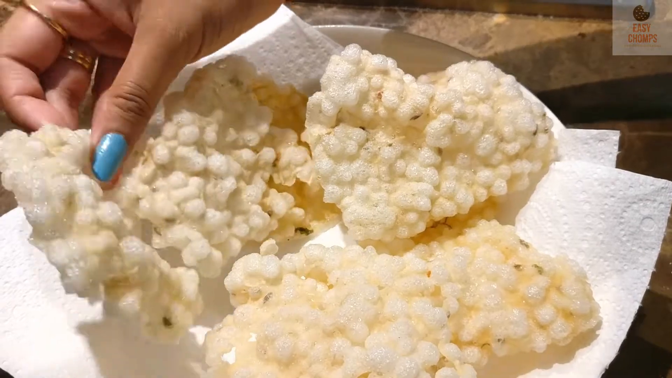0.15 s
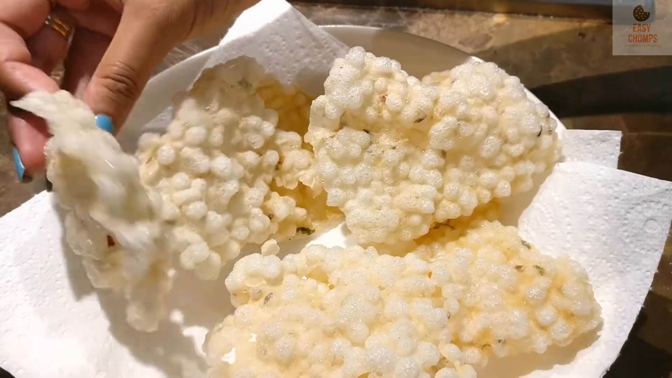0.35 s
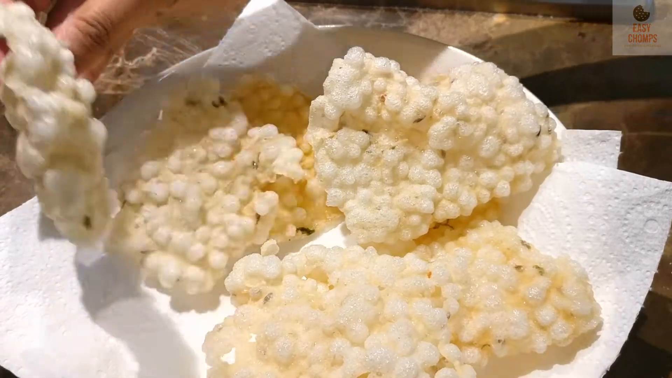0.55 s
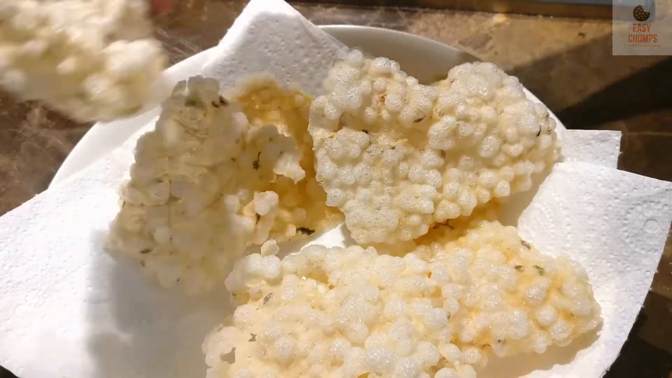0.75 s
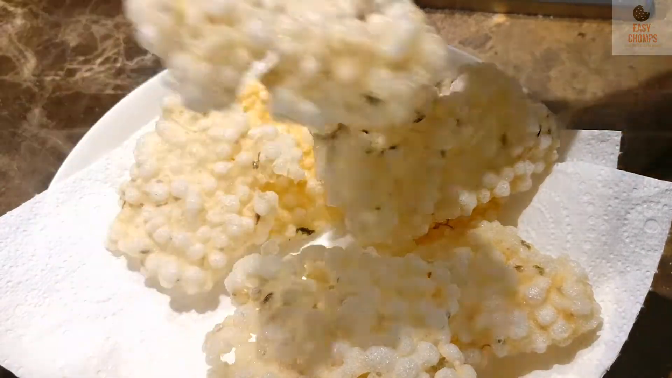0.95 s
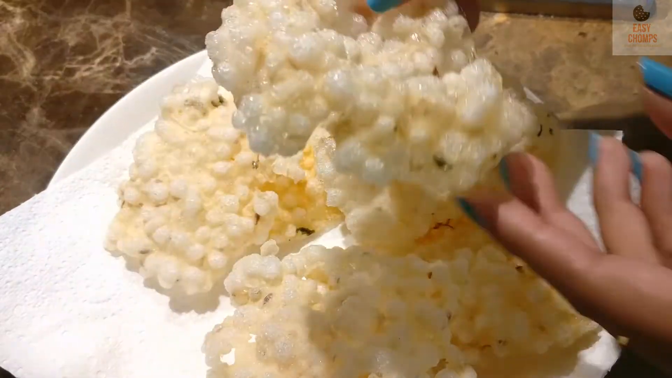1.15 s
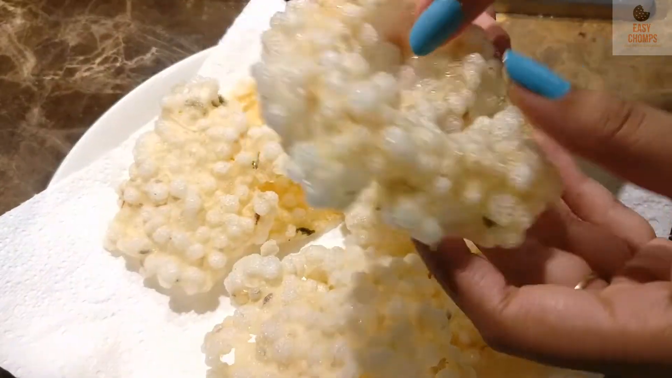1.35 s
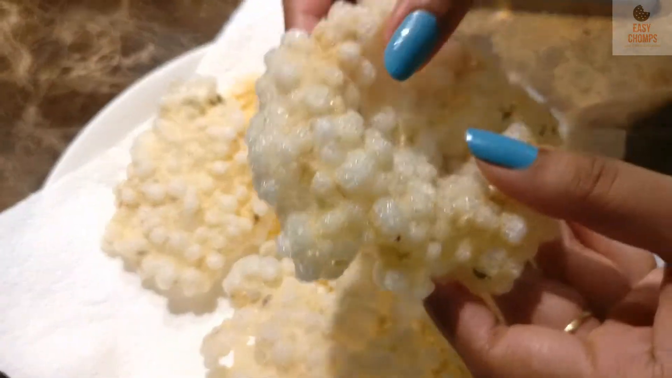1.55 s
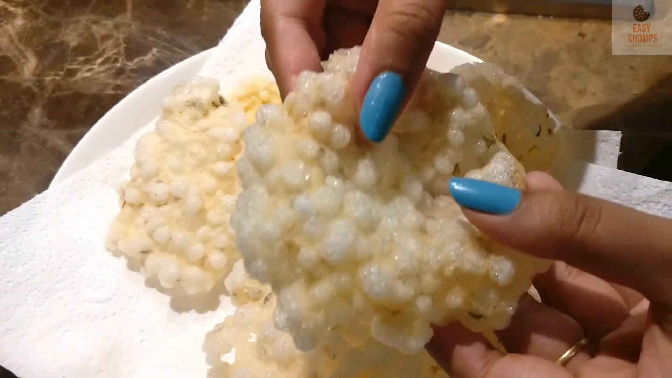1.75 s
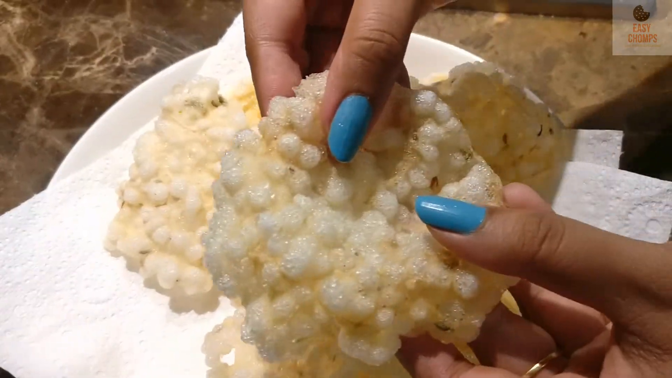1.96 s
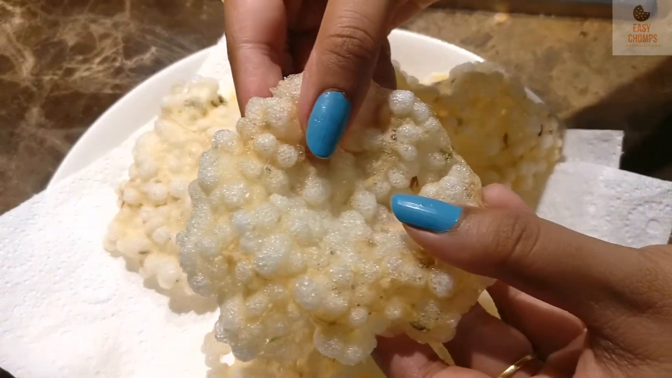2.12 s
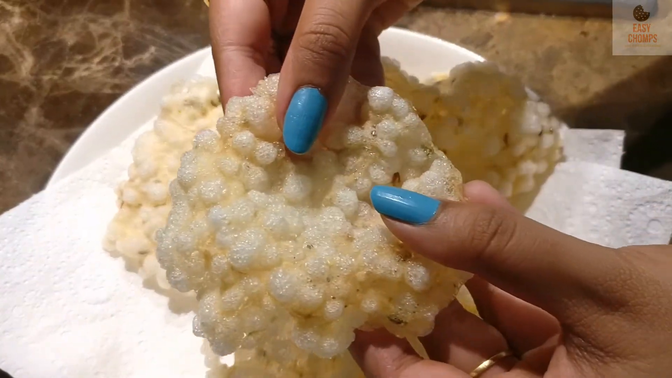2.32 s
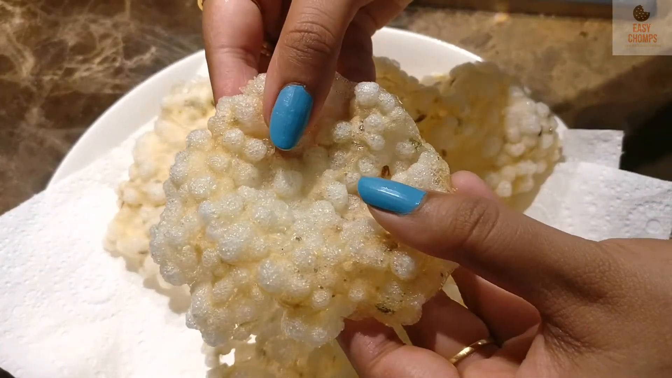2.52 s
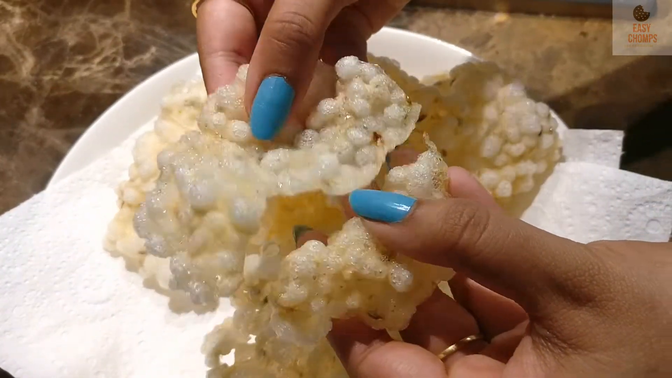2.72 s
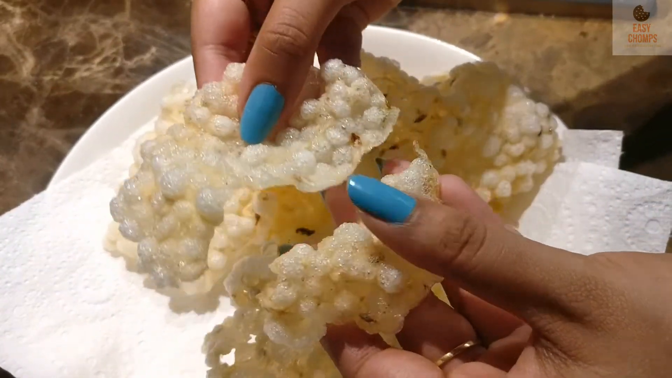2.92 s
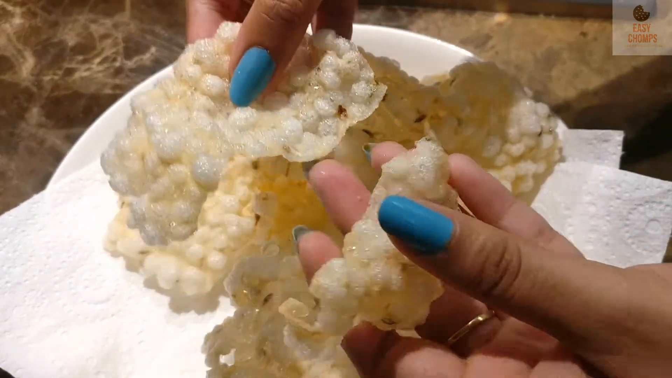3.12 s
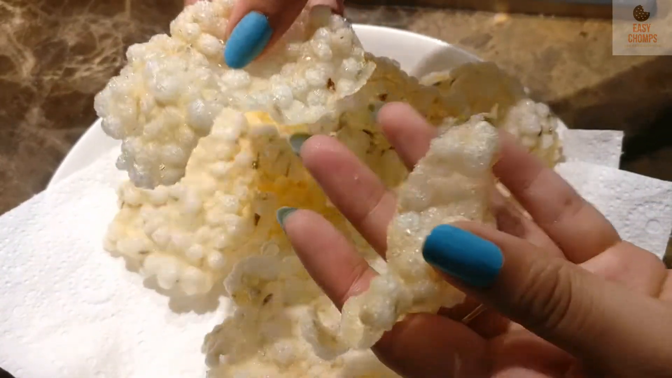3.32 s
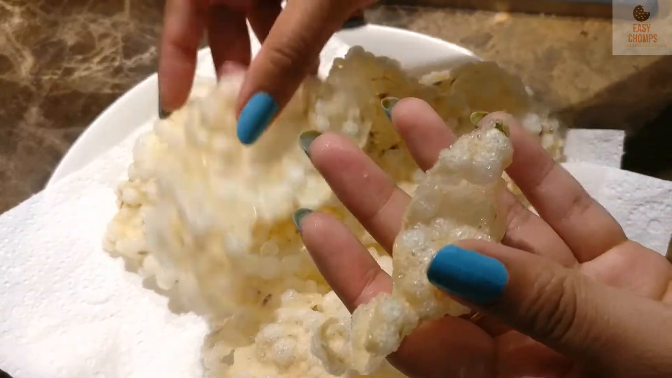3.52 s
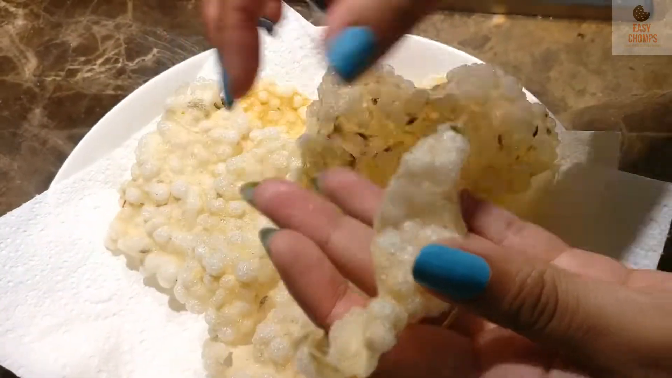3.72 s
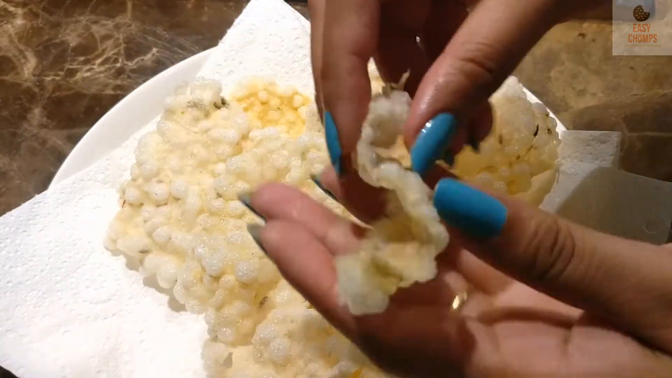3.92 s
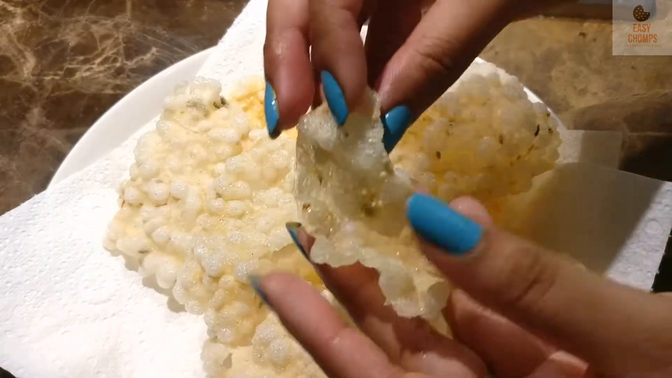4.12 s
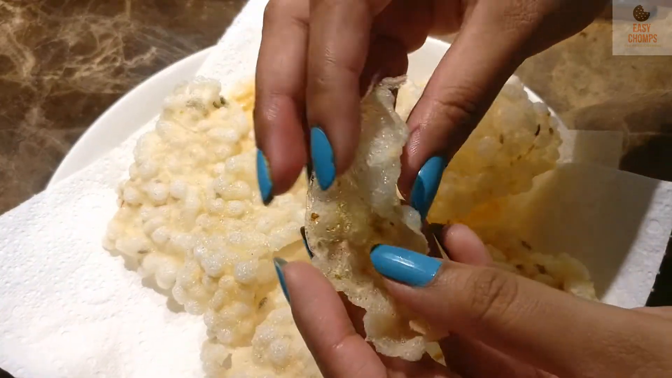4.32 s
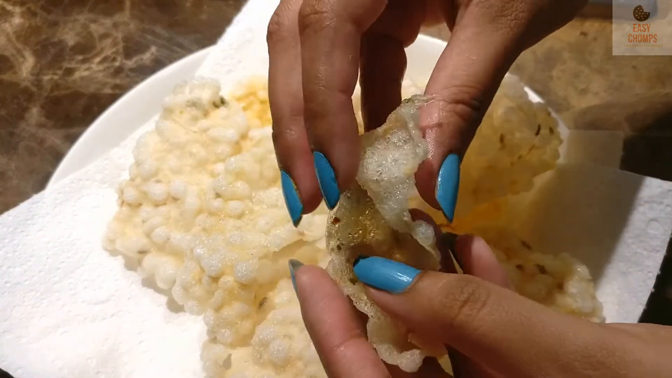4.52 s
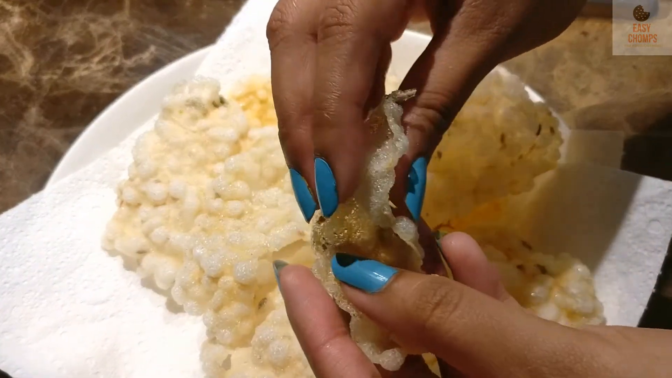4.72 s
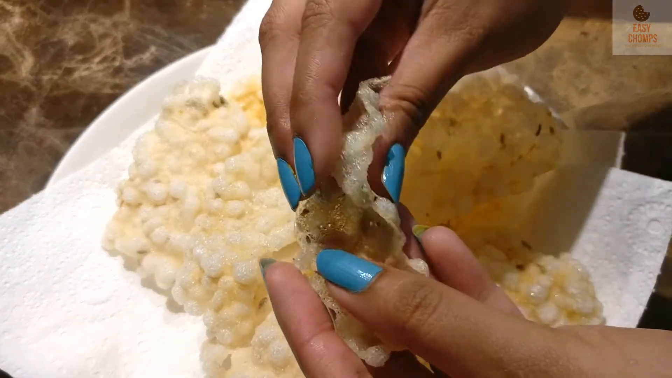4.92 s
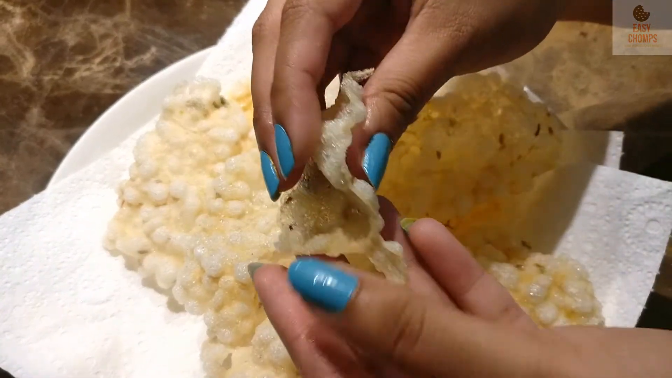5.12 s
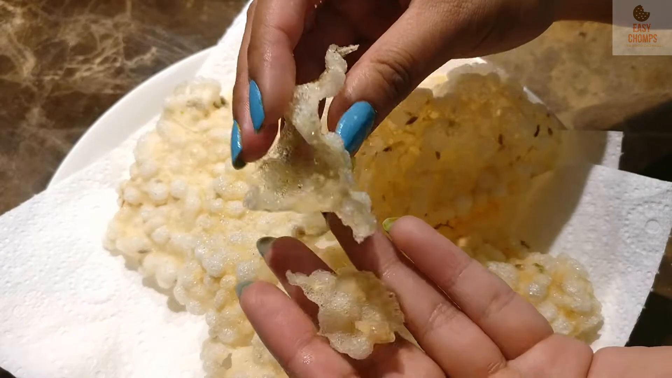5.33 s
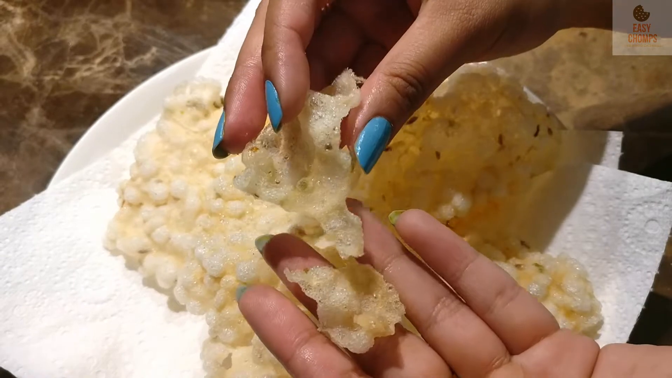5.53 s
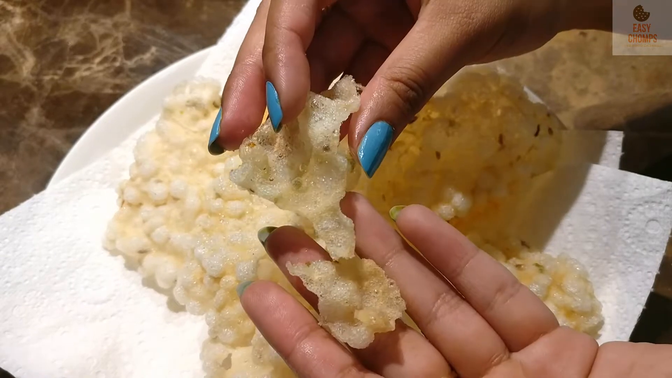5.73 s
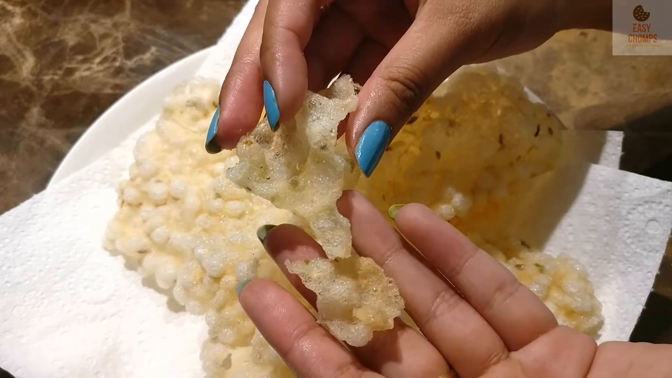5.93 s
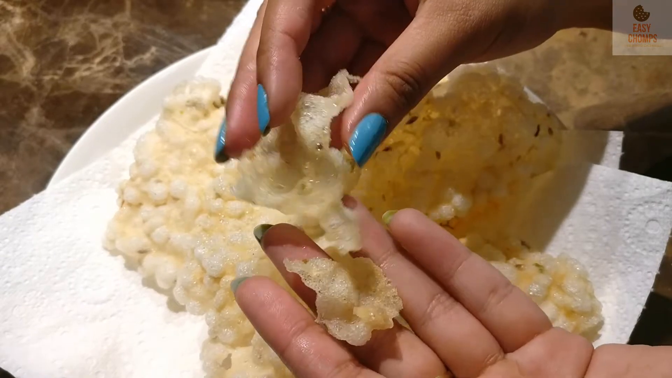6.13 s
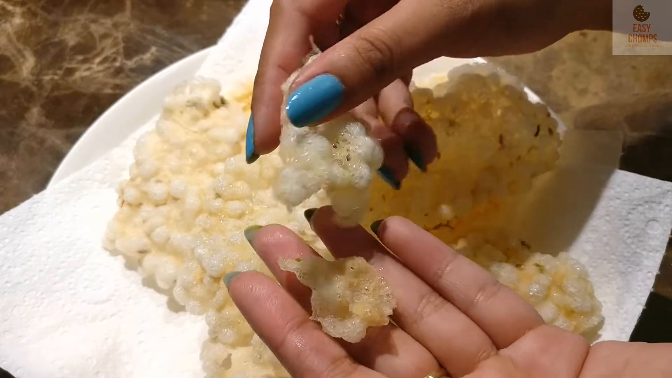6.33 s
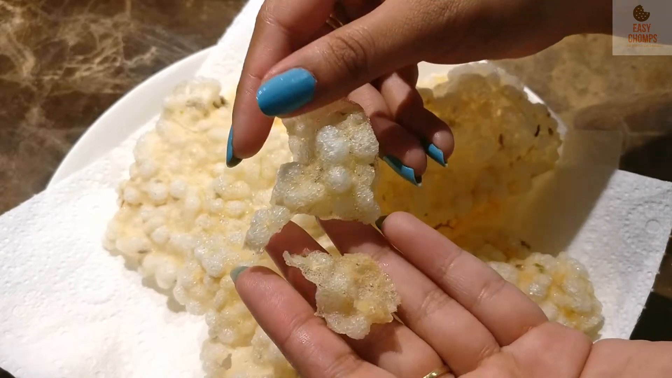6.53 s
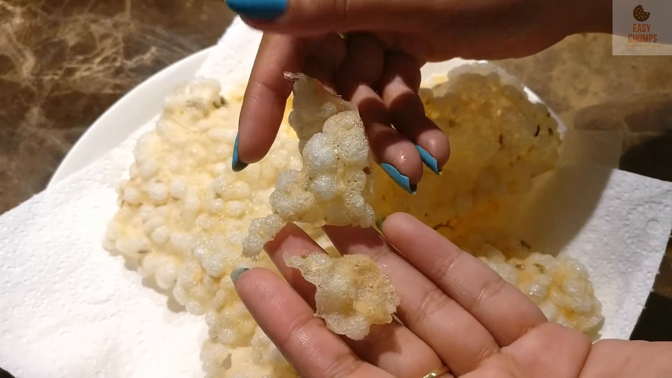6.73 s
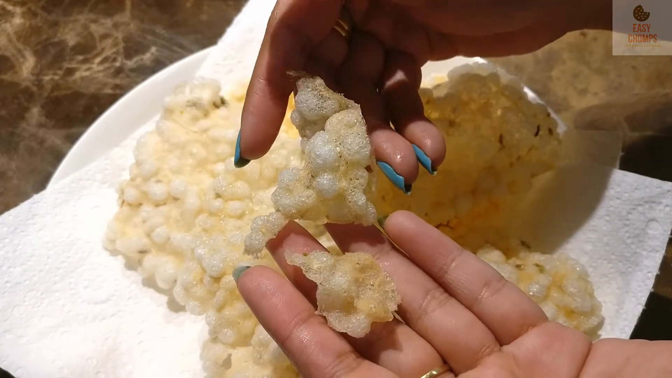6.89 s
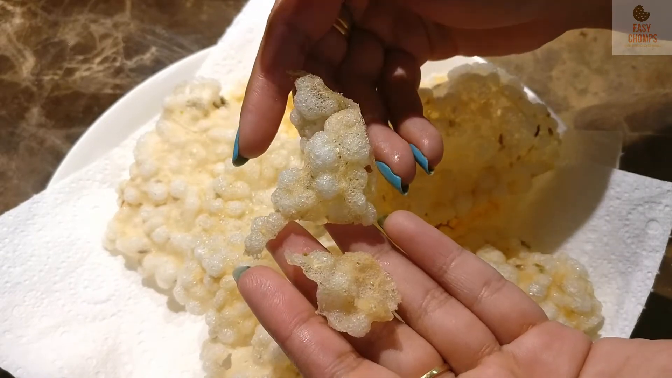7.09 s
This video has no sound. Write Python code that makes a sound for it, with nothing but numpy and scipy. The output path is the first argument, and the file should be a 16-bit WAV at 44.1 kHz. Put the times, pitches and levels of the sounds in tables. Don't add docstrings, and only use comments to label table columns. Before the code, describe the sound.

A low fan hum near 48 Hz wavers throughout with room rumble and soft hiss, in a kitchen with short, faint echoes. From 0 to 0.6 s, quiet scratchy rubs and small dry ticks as a puffed fried cracker is lifted; from 0.55 s a faint papery brush for about 0.4 s, with two light ticks near 0.95. Between 1.2 and 1.8 s, delicate crackly handling. From 1.95 to 2.7 s, separate brittle snaps gather as it bends, then at 2.73 s a dense, loud, bright tearing crack, over in a few hundredths of a second, with short woody body. Small rustles follow; around 3.65 s the piece lands with a light crunch. Fine ticks near 4, crackles at 4.35-4.5, then a sharp snap at 4.93 s with trailing crumbs. After 5.1 s only sparse tiny ticks and faint rubs over the hum until about 7.1 s.

```python
import sys
import numpy as np
from scipy import signal
from scipy.fft import rfft, irfft, next_fast_len
from scipy.io import wavfile
from scipy.ndimage import uniform_filter1d, minimum_filter1d

SR = 44100
rng = np.random.default_rng(int(sys.argv[2]) if len(sys.argv) > 2 else 0)


def pcm_store(signal):
    levels = np.round(np.clip(np.atleast_2d(signal), -1, 1) * 32767)
    wavfile.write(sys.argv[1], SR, levels.astype(np.int16).T)


def gain_from_db(level_db):
    decades = np.asarray(level_db, float) / 20
    return 10 ** decades


N = 315674
SIZE = next_fast_len(N)
FREQ = np.fft.rfftfreq(SIZE, 1 / SR)
TIME_S = np.arange(N) / SR
TOP_EDGE_HZ = 15820
TREBLE_FROM_HZ, TREBLE_CUT_DB = 6300, -24


def on_log_hz(table, hz):
    f, v = np.transpose(table)
    return np.interp(np.log(hz + 1), np.log(f), v)


def causal(table, size=512):
    cepstrum = irfft(np.log(gain_from_db(on_log_hz(table, np.fft.rfftfreq(size, 1 / SR)))))
    cepstrum[1:size // 2] *= 2
    cepstrum[size // 2 + 1:] = 0
    return irfft(np.exp(rfft(cepstrum)))


def band(x, lo_hz, hi_hz):
    edges = [lo_hz, min(hi_hz, .45 * SR)]
    return signal.sosfilt(signal.butter(2, edges, "band", fs=SR, output="sos"), x)


def walk(rate_hz):
    hold = int(SR / rate_hz)
    steps = np.repeat(rng.standard_normal(N // hold + 1), hold)
    return 1.3 * uniform_filter1d(uniform_filter1d(steps, hold), hold)[:N]


def stereo_noise(gain, alike_hz=540, steep=2.2):
    draws = rng.standard_normal((2, len(FREQ))) + 1j * rng.standard_normal((2, len(FREQ)))
    mid, side = draws * gain
    alike = .996 / (1 + (FREQ / alike_hz) ** steep)
    mid, side = mid * np.sqrt(1 + alike), side * np.sqrt(1 - alike)
    return irfft([mid + side, mid - side], SIZE)[:, :N]


def kitchen():
    # freq_hz, density_db [dB per Hz]
    hiss_colour = [(110, -19.5), (150, -3), (180, -17.5), (300, -15), (480, -18.5), (950, -19.5),
                   (2300, -23.5), (3100, -29), (4500, -30), (5600, -34), (7500, -43.5), (11000, -40.5),
                   (15300, -34), (15750, -30.5)]
    # freq_hz, width_hz, level_db
    rumble = [(46, 11, -63.5), (69, 14, -53), (100.1, 20.3, -52), (121.8, 11, -61), (141, 32, -65.5),
              (193.8, 32, -68.5), (281.9, 34, -71), (393.5, 9.7, -81)]
    hiss_db, busy_db, busy_s = -68.5, 2.5, 2
    hiss = stereo_noise(gain_from_db(on_log_hz(hiss_colour, FREQ)) * (FREQ < TOP_EDGE_HZ))
    drift_db = busy_db * np.exp(-TIME_S / busy_s)
    out = hiss * gain_from_db(hiss_db + 3.0 + drift_db + 0.18 * walk(2.0)) / np.std(band(hiss, 320, 16500))
    for hz, width, db in rumble:
        mode = stereo_noise(1 / (1 + (2 * (FREQ - hz) / width) ** 2))
        out = out + mode * gain_from_db(db + 0.23 * walk(1.0)) / np.std(mode)
    squeak_s, length_s, squeak_hz, squeak_db = 3.49, .1, 1160, -77
    squeak = band(rng.standard_normal(N), squeak_hz - 25, squeak_hz + 25)
    swell = np.exp(-((TIME_S - squeak_s) / length_s) ** 4)
    return out + gain_from_db(squeak_db) * squeak / np.std(squeak) * swell


def fan_tone(tone_hz=47.8, wander_hz=.8, flutter_db=3, pan_db=1.1):
    # time_s, level_db
    swells = [(0.0, -57.5), (1.04, -62), (1.08, -56.5), (1.93, -54), (2.05, -73), (2.11, -53.5),
              (2.91, -61.5), (2.95, -54.5), (4.6, -59), (4.64, -53.5), (5.54, -53.5), (6.22, -65),
              (6.74, -53.5), (7.16, -52.5)]
    s, db = np.transpose(swells)
    phase = 2 * np.pi * np.cumsum(tone_hz + wander_hz * walk(3.0)) / SR
    pan = pan_db * walk(6.5) * np.array([[1], [-1]])
    level_db = np.interp(TIME_S, s, db) + flutter_db * walk(22) + pan
    return 2 ** .5 * gain_from_db(level_db) * np.sin(phase)


def scuffs():
    # centre_s, level_db, length_ms, ring_hz, treble_db
    sheet_rubs = [(0.063, -60, 38, 3650, -15), (.19, -56.5, 72, 4120, -6), (.265, -62, 49, 4000, -9.5),
                  (0.304, -58.5, 29, 3900, -9), (0.368, -68, 26, 4930, -3), (.475, -58.5, 39, 3770, -9),
                  (.547, -62, 37, 3970, -20.5), (1.328, -60, 19.6, 4300, -5), (1.401, -60.5, 33, 4170, -10),
                  (1.444, -61, 33, 4300, -6.5), (1.65, -59, 45, 4260, -7), (1.735, -58, 46, 4270, -4),
                  (1.79, -66.5, 18, 4200, -13), (2.744, -29, 28, 4524, -1), (2.845, -49, 60, 3780, -11.5),
                  (3.249, -55.5, 56, 4120, -16), (3.648, -47.5, 42, 4700, -5.5)]
    # centre_s, level_db, length_ms, ring_hz, treble_db
    strip_rubs = [(3.432, -58.5, 66, 5200, -14.5), (3.49, -63, 24, 3560, -14), (3.967, -58, 52, 5100, -6.5),
                  (4.084, -65.5, 110, 5100, 0), (4.148, -60, 18, 4970, 4), (4.32, -65.5, 39, 5000, 1.3),
                  (4.378, -45.5, 34, 4400, -8.5), (4.464, -42, 31.5, 3780, -13.5),
                  (4.645, -65, 18, 5140, 1), (4.732, -65, 62, 4380, -4.5), (4.916, -44.5, 13, 4430, -5),
                  (4.942, -45, 26, 3240, -17.5), (5.152, -65.5, 52, 4370, 0), (5.313, -62, 41, 5020, -9.5),
                  (5.6, -73, 90, 5470, -18), (5.78, -85, 55, 5560, 8), (6.212, -66, 22, 5470, 4.5),
                  (6.405, -61, 36, 4730, -13), (4.83, -69.5, 44, 4500, -1), (5.486, -65, 8, 5570, -15),
                  (5.645, -69, 8, 5550, -11)]
    sheet, strip = np.transpose(sheet_rubs), np.transpose(strip_rubs)
    lifted_s, laid_s, pile_db = .6, 3.5, 4
    resting = (sheet[0] < lifted_s) | (sheet[0] > laid_s)
    sheet_body = -3 + np.where(resting, pile_db, -pile_db)
    press_db = -54
    strip_body = -8.5 + 0.64 * np.minimum(strip[1] - press_db, 0)
    return np.vstack([np.hstack([sheet, strip]), np.hstack([sheet_body, strip_body])])


def scuff_snaps(scatter_db=2.5, detune=.15, boost_db=-8, sheet_db=-9.5, count=70):
    s, db, ms, hz, tick_db, body_db = (c[:, None] for c in scuffs())
    chance = rng.random((len(s), 4, count))
    place = chance[:, 0] + chance[:, 1] - 1
    size_db = db + boost_db + 10 * np.log10(ms / 40) - scatter_db * np.log(chance[:, 2] + 0.0084)
    free_from_s, free_to_s, free_ring_db = 1.2, 1.9, 10
    ring_db = sheet_db + free_ring_db * ((s > free_from_s) & (s < free_to_s))
    pitch = hz * np.exp(detune * 2.7 * (chance[:, 3] - .5))
    columns = np.broadcast_arrays(s + .75 * place * ms / 1000, size_db, pitch, tick_db, ring_db, body_db)
    return np.stack([c.ravel() for c in columns], axis=1)


def big_snaps():
    # start_s, peak_db, ring_hz (shard), tick_db (treble)
    lift_rows = [(.0939, -44, 3160, -10), (.1775, -38.5, 4500, -15.5), (.1941, -39.5, 3100, -13),
                 (.2212, -54, 2200, -33), (.3654, -55, 2890, -0.5), (.4585, -44, 2860, -4),
                 (.5402, -49, 2540, -15), (.5741, -50.5, 1830, 1), (.9167, -42, 5250, -0.5),
                 (.9783, -42.5, 3360, -16.5), (1.2394, -49.5, 3770, -27), (1.4434, -47.5, 3200, -25),
                 (1.4578, -53, 3030, -21), (1.6537, -36.5, 2970, -14), (1.7461, -46, 2830, -16)]
    # start_s, peak_db, ring_hz, tick_db, sheet_db (ring)
    bend_rows = [(1.9624, -61, 2700, 1, -17), (1.9845, -35, 5540, -5.5, 5), (2.0138, -49, 4250, -13, -10),
                 (2.0631, -49.5, 4690, -7, -10.5), (2.116, -56, 4940, -8, -13),
                 (2.162, -51.5, 4000, -6, -12), (2.1685, -29.5, 5860, 3, -4),
                 (2.186, -31.5, 4240, -14, 4.5), (2.2497, -36.5, 5700, -4.5, -9),
                 (2.2682, -37.5, 4070, -20, -3), (2.2946, -39.5, 3893, -8.5, -16),
                 (2.304, -42.5, 4060, -17, 0), (2.382, -46, 4000, -3.5, 0.5),
                 (2.3922, -32.5, 5800, -1, -0.3), (2.4018, -28.5, 4438, -6, 5.5),
                 (2.5175, -45.5, 4300, 0, 2.5), (2.5429, -39.5, 4190, -3, -3),
                 (2.5621, -40, 5600, -2.5, -7.5), (2.6013, -40.5, 4410, 0, 0.5),
                 (2.638, -38, 4250, -4.5, -1.5), (2.6765, -46, 5950, -3, -21),
                 (2.6953, -51.5, 2845, 3.5, -27)]
    # start_s, peak_db, ring_hz, tick_db, sheet_db
    tear_rows = [(2.7263, -27.5, 4700, -7.5, 5), (2.729, -23.5, 4470, -14.5, -15),
                 (2.733, -15, 3100, -10.5, -11), (2.7367, -11.5, 4670, -10.5, -21.5),
                 (2.7383, -20.5, 4600, -5, -13), (2.7407, -8.5, 5300, -11, -19.5),
                 (2.7414, -19.5, 5300, -17, -18), (2.7499, -21, 5200, -8, -6), (2.7525, -23, 5500, -8.5, 6),
                 (2.7577, -28.5, 4000, -13, 4.5), (2.764, -30, 4000, -12, -11.5),
                 (2.799, -40.5, 5500, -18, 7.5), (2.8567, -41.5, 2620, -11.5, -2),
                 (2.8783, -49, 4520, -17, -4)]
    # start_s, peak_db, ring_hz, tick_db, knock_db (body)
    lay_rows = [(3.2219, -57.5, 5000, 2, 10.5), (3.2303, -51, 3000, -16, -6), (3.2513, -49, 4870, -1, -1),
                (3.4197, -48, 5940, -19, -18), (3.4351, -42, 4570, -13.5, -33),
                (3.6266, -39.5, 4570, -5.5, 0), (3.6406, -29.5, 4750, -16, -24),
                (3.648, -34.5, 2190, -15.5, 2), (3.655, -39, 4840, 1.5, -21),
                (3.875, -51.5, 1800, -5.5, -25.5), (3.9449, -41, 4300, -10, -9),
                (3.9835, -45, 4500, -2, -8), (4.0802, -50.5, 5500, -8.5, -8.5), (4.1408, -53, 5000, 5, 0)]
    # start_s, peak_db, ring_hz, tick_db
    strip_rows = [(4.3606, -42, 6400, 5), (4.3735, -43.5, 4300, -2), (4.3737, -35.5, 5400, -13),
                  (4.3952, -35, 4650, -13), (4.412, -50, 4940, -8), (4.4369, -49.5, 3330, -10),
                  (4.448, -30.5, 3920, -11.5), (4.4539, -34.5, 3970, -5), (4.4661, -30, 4120, -13.5),
                  (4.497, -51, 3880, -23), (4.716, -53.5, 4300, 4), (4.7262, -49, 4430, -28),
                  (4.806, -57, 3060, -1), (4.863, -34, 3430, 0), (4.885, -46, 6030, 2.5),
                  (4.9059, -26, 7850, -5.5), (4.9152, -39, 4440, -4.5), (4.922, -25.5, 5950, -5.5),
                  (4.9273, -20, 3960, -1), (4.9283, -12, 4280, -13), (4.9355, -23.5, 3670, -6),
                  (4.9425, -52.5, 4220, -13), (4.9528, -43, 3270, -8), (4.99, -52, 4480, -24),
                  (4.999, -48.5, 4500, -17), (5.2264, -44.5, 4720, -5), (5.3558, -47, 8700, 2.5),
                  (5.9041, -53, 5830, 2.5), (6.2, -58, 5180, 3), (6.388, -56, 4670, -1)]
    lift, bend, tear, lay, strip = map(np.transpose, (lift_rows, bend_rows, tear_rows, lay_rows, strip_rows))
    dull_db = -0.72 * lift[3]
    lay_sheet_db = -17
    stages = [
        (*lift, -21.5 + dull_db, -20.5 + dull_db),
        (*bend, -14),
        (*tear, -19),
        (*lay[:4], lay_sheet_db, lay[4]),
        (*strip, -31, -22.5),
    ]
    return np.vstack([np.transpose(np.broadcast_arrays(*stage)) for stage in stages])


def fracture(rows, cycles=2.45, sheet_cycles=3.5, crack_ms=1.0, crack_db=-1, tick_ms=0.5, knock_ms=1.68,
             size=400):
    s, db, hz, tick_db, sheet_db, knock_db = (c[:, None] for c in np.transpose(rows))
    t = np.arange(size) / SR
    noise = rng.standard_normal((len(rows), 5, size)).swapaxes(0, 1)
    rise = 1 - np.exp(-t / 0.00026)
    shard = 1.72 * np.sin(2 * np.pi * hz * t) * np.exp(-t * hz / cycles)
    sheet_hz = 2980 * (1 + .042 * noise[4, :, :1])
    sheet = np.sin(2 * np.pi * sheet_hz * t) * np.exp(-t * sheet_hz / sheet_cycles)
    ring = shard + 1.24 * gain_from_db(sheet_db) * sheet
    small_from_s, small_crack_db = 4.924, -3
    crack_level = gain_from_db(crack_db + small_crack_db * (s > small_from_s))
    crack = crack_level * band(noise[:2] * np.exp(-t * 1000 / crack_ms), 3050, 6950)
    tick = gain_from_db(tick_db + 8) * band(noise[2:4] * np.exp(-t * 1000 / tick_ms), 7000, 17000)
    knock = gain_from_db(knock_db + 13.5) * band(noise[4] * np.exp(-t * 1000 / knock_ms), 896, 2480)
    burst = gain_from_db(db) * rise * (ring + crack + tick + knock)
    where = ((s * SR).astype(int) + np.arange(size)).ravel()
    return np.array([np.bincount(where, b.ravel(), minlength=SIZE)[:SIZE] for b in burst])


def thuds(size=2600):
    # start_s, peak_db, pitch_hz, decay_ms
    thud_rows = [
        (0.464, -63, 1580, 13),
        (1.654, -57.5, 1110, 2.5),
        (2.737, -40.5, 1110, 8.8),
        (2.739, -45, 2200, 9.2),
        (2.741, -62, 460, 5.6),
        (2.742, -67.5, 260, 11),
        (3.645, -60, 514, 5.9),
        (3.647, -73, 300, 6.3),
        (3.649, -54, 1930, 5.4),
        (4.929, -70, 957, 6.1),
    ]
    out = np.zeros(SIZE)
    t = np.arange(size) / SR
    for s, db, hz, ms in thud_rows:
        push = rng.standard_normal(size) * np.exp(-t * 1000 / ms)
        ring = band(push, hz * 0.94, hz * 1.16)
        start = int(s * SR)
        out[start:start + size] += gain_from_db(db + 16) * ring / np.max(np.abs(ring))
    return out


def brush(start_s=.55, swell_s=.03, fade_s=.36):
    # centre_hz, width_hz, level_db
    paper_bands = [(5200, 520, -69.5), (2020, 320, -70), (6150, 1200, -78), (7660, 4100, -87)]
    t = np.arange(SR) / SR
    stroke = (1 - np.exp(-t / swell_s)) * np.exp(-(t / fade_s) ** 4)
    out = np.zeros((2, N))
    start = int(start_s * SR)
    for hz, width, db in paper_bands:
        hiss = band(rng.standard_normal((2, SR)), hz - width / 2, hz + width / 2)
        out[:, start:start + SR] += gain_from_db(db + 2.2 * walk(30)[:SR]) * stroke * hiss / np.std(hiss)
    return out


def more_snaps(sheet_db=-20, knock_db=-20):
    # start_s, peak_db, ring_hz (shard), tick_db (treble)
    more_rows = [(1.3213, -55.5, 4500, -1), (1.401, -52.5, 6560, -12), (1.661, -46, 4630, -13),
                 (3.9102, -59, 4500, -10), (3.9406, -44.5, 5200, -6), (3.9472, -49, 4400, -8),
                 (3.9726, -43, 5800, -9), (3.988, -50, 4400, -12), (4.1197, -60, 5000, 5.5),
                 (4.1442, -47, 2570, -9), (4.152, -54, 4800, 3), (4.583, -55, 5000, -4),
                 (4.642, -60, 4220, -2), (4.762, -53, 4500, -2), (4.815, -53, 4400, -2),
                 (4.8326, -65, 5000, 3), (4.851, -54, 4500, 0), (4.9444, -29.5, 3700, -18),
                 (4.9478, -31, 3400, -18.5), (4.9611, -43, 3480, -16), (4.969, -43, 4500, -18),
                 (4.983, -51, 4400, -18), (5.014, -53, 4500, -13), (5.024, -56, 4700, -13),
                 (5.042, -56, 4700, -18), (5.5627, -57, 5800, -14), (5.6436, -57, 5500, -8),
                 (5.756, -69, 4480, 4.5), (5.7768, -67, 4530, 4), (5.797, -70, 4500, 4),
                 (6.3984, -49.5, 4400, -9), (6.4355, -52, 4330, -8)]
    return np.transpose(np.broadcast_arrays(*np.transpose(more_rows), sheet_db, knock_db))


def reflections(t60_s, db, onset_ms=0.63, treble=0.34):
    t = np.arange(int(.5 * SR)) / SR
    out = 0
    for hz in 350 * 2. ** np.arange(6):
        fade = np.exp(-np.log(1000) * t / (max(t60_s, .01) * (1000 / hz) ** treble))
        out = out + band(rng.standard_normal((2, len(t))), hz / 2 ** .5, hz * 2 ** .5) * fade
    out = out * (1 - np.exp(-t * 1000 / onset_ms))
    return gain_from_db(db) * out / np.sqrt(np.mean(np.sum(out ** 2, axis=1)))


def ports():
    # freq_hz, gain_db
    left_colour = [(300, 2), (1200, -10.5), (1800, -9), (2450, -3), (3200, -6), (4100, -5.5), (5000, -7.5),
                   (5900, -13.5), (8000, -9.5), (11500, 0.5), (15000, 5.5), (16300, -6), (16900, -37)]
    # freq_hz, gain_db
    right_colour = [(300, 2), (1400, -8.5), (2400, -0.5), (3300, 0), (4200, 5), (5800, 6.5), (7300, 1),
                    (9000, 0.5), (12500, 1.5), (15200, 10.5), (16300, -7.5), (16900, -54.5)]
    # freq_hz, lead_rad
    left_lead = [(300, 0.6), (1100, 0.5), (1700, -1.3), (2400, -2.5), (3300, -2), (4200, -2.5),
                 (6000, -1.5), (16000, -5)]
    right = rfft(causal(right_colour), SIZE)
    left_phase = np.angle(right) + on_log_hz(left_lead, FREQ)
    left = gain_from_db(on_log_hz(left_colour, FREQ)) * np.exp(1j * left_phase)
    return np.array([left, right])


def cracker():
    soft = rfft(fracture(scuff_snaps(), cycles=1.88, sheet_cycles=10, crack_db=2.5))
    sharp = rfft(fracture(big_snaps(), sheet_cycles=2.4) + thuds())
    sharp = sharp + rfft(fracture(more_snaps(), cycles=2.2, sheet_cycles=2.4))
    plate = reflections(0.078, -8)
    walls = reflections(0.5, -15)
    echoes = rfft(plate + walls, SIZE)
    heard = sharp + (soft + (sharp + soft) * echoes) * (FREQ < TOP_EDGE_HZ)
    return irfft(heard * ports(), SIZE)[:, :N]


def duck(cells, quiet, size):
    return signal.istft(cells * np.where(quiet, gain_from_db(TREBLE_CUT_DB), 1), SR, nperseg=size)[1][:, :N]


def gate(x, size=1536, under_db=-.65, open_db=9):
    hz, _, cells = signal.stft(x, SR, nperseg=size)
    power = uniform_filter1d(np.mean(np.abs(cells) ** 2, axis=0), size=11, axis=0)
    power = power / (np.median(power, axis=1)[:, None] + 1e-18)
    around = uniform_filter1d(power, size=71, axis=0)
    sunk = (power < gain_from_db(2 * under_db) * around) & (around < gain_from_db(2 * open_db))
    return duck(cells, sunk & (hz[:, None] > TREBLE_FROM_HZ), size)


def mask(x, size=256, reach_s=.034, click_db=12, under_db=.9):
    hz, _, cells = signal.stft(x, SR, nperseg=size)
    power = np.mean(np.abs(cells) ** 2, axis=0)
    power = uniform_filter1d(power / (np.median(power, axis=1)[:, None] + 1e-18), size=7, axis=0)
    treble = np.mean(power[hz > TREBLE_FROM_HZ][:50], axis=0)
    click = treble > gain_from_db(2 * click_db) * minimum_filter1d(treble, size=7)
    reach = int(reach_s * SR / size * 2)
    near = uniform_filter1d(click * 1., size=reach, origin=-(reach // 8)) > 1e-6
    quiet = near & (power < gain_from_db(2 * under_db)) & (hz[:, None] > TREBLE_FROM_HZ)
    return duck(cells, quiet, size)


def scene():
    return kitchen() + fan_tone() + cracker() + brush()


def band_limit(x):
    return signal.sosfilt(signal.butter(12, 16980, fs=SR, output="sos"), x)


def record(dry):
    deep_cut = signal.butter(3, 36, "high", fs=SR, output="sos")
    dry = signal.sosfilt(deep_cut, dry)
    return band_limit(mask(gate(dry)))


dry = scene()
out = record(dry)
pcm_store(out)
```